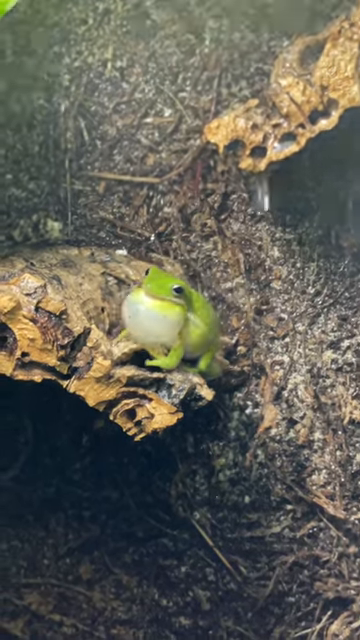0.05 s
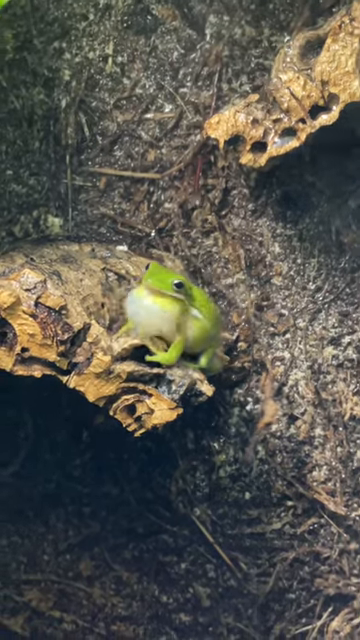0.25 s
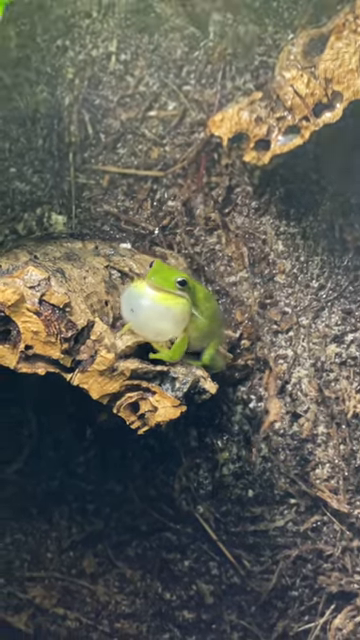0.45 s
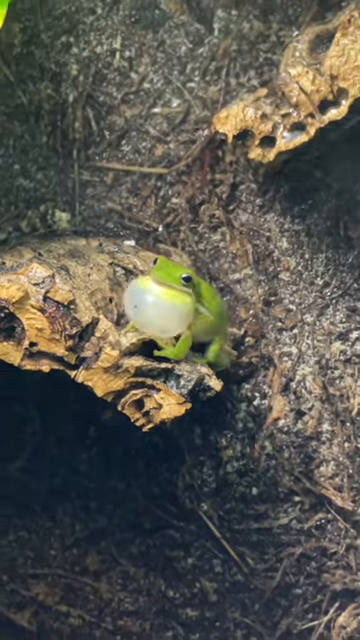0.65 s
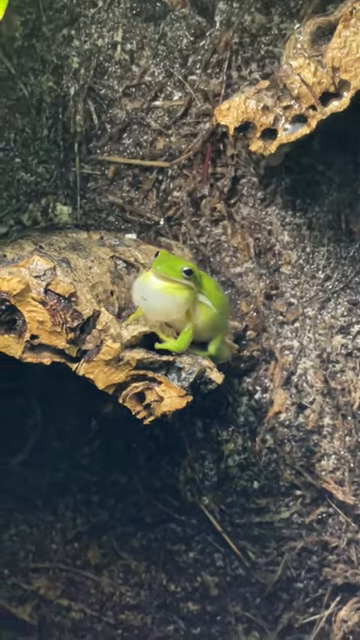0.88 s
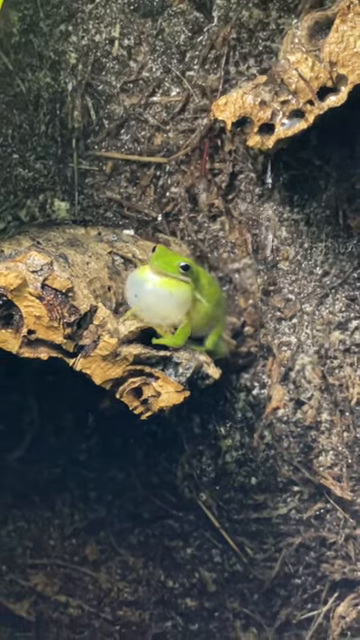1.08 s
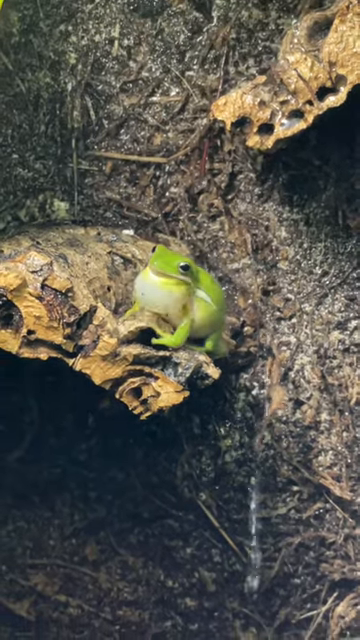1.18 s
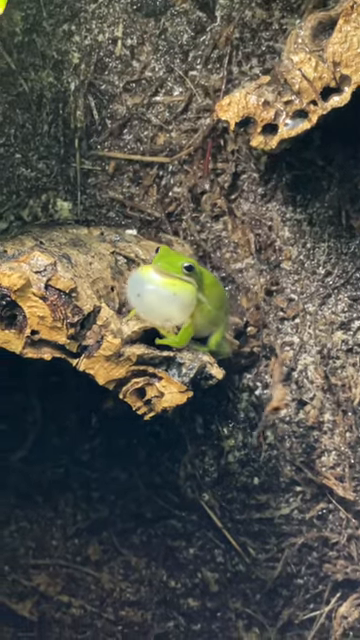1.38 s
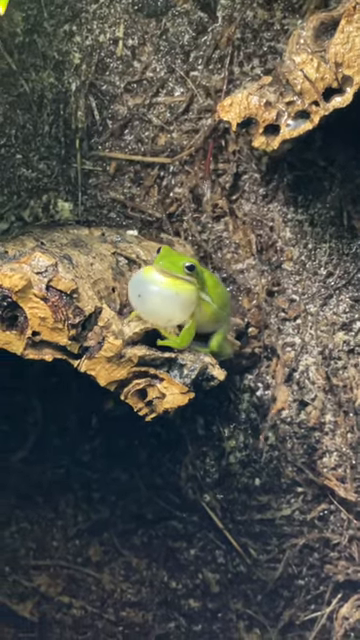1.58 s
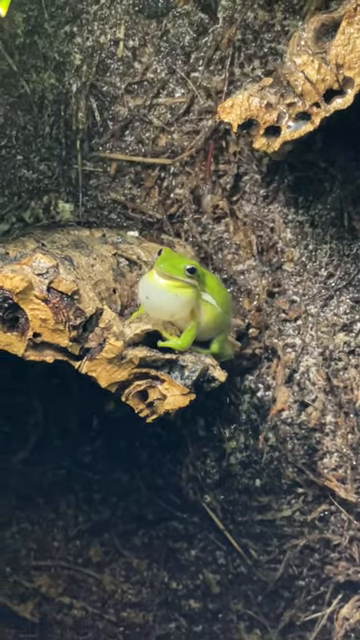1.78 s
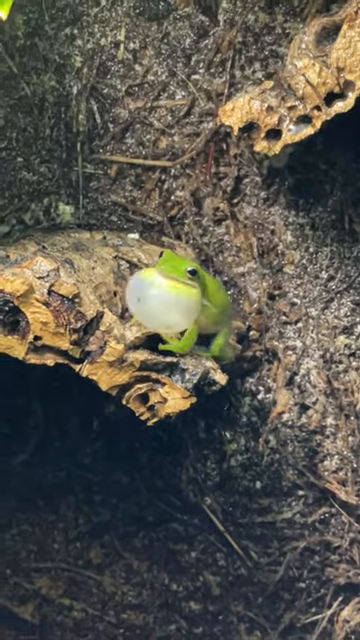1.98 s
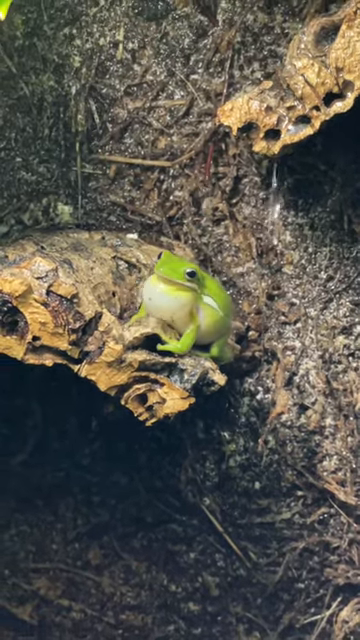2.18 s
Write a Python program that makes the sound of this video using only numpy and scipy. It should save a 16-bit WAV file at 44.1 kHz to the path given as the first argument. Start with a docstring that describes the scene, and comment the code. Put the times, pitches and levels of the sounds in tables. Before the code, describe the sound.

Close to the microphone, a single frog gives six loud, raspy, throbbing croaks at an even pace in a terrarium. A misting nozzle puffs softly twice early on, over the faint hum and rumble of a quiet room.

```python
"""A terrarium in a quiet room, where a green treefrog croaks six times.
Each croak opens with a tick, throbs and rasps as the vocal cords snap irregularly into the
vocal sac, and ends in a short clean note. The tank and the room add faint tails.
A misting nozzle puffs twice at the start; mains hum and a low rumble lie underneath."""
import sys
import numpy as np
from scipy import signal
from scipy.fft import rfft, irfft
from scipy.io import wavfile
from scipy.ndimage import uniform_filter1d

SR = 44100
rng = np.random.default_rng(int(sys.argv[2]) if len(sys.argv) > 2 else 0)


def persist_wave(psi):
    """Save psi, clipped to +-1, as 16-bit WAV."""
    counts = np.round(np.clip(psi, -1, 1) * 32767).astype(np.int16)
    wavfile.write(sys.argv[1], SR, np.atleast_2d(counts).T)


N = 99225
T = np.arange(N) / SR

# Croak cues: (start [s], length [s], rasp level [dB], tone level [dB], cord pitch [Hz],
# first throb rate [Hz], throb depth [0-1], snap rate [1/s], swell time [s], rasp throb fade [s])
CROAK_CUES = [(0.21, 0.121, -14.5, -20, 1021, 48.8, 0.1, 150, 0.06, 0.03),
              (0.553, 0.120, -13, -18, 1032, 47, 0.9, 230, 0.052, 0.038),
              (0.86, 0.096, -12.5, -18.5, 1035, 43.5, 0.83, 250, 0.039, 0.056),
              (1.172, 0.11, -12.5, -18, 1017, 43.7, 0.9, 240, 0.059, .035),
              (1.497, 0.114, -13.5, -18, 1024, 45.3, 0.85, 250, 0.055, 0.032),
              (1.857, 0.12, -13, -18, 1015, 43.35, 0.92, 240, 0.047, 0.035)]
def croak(start, length, rasp_db, tone_db, pitch_hz, throb_hz, depth, snap_rate, swell_s, throb_fade_s):
    """A tick, then a rasp and a cord tone that throb together, ever more slowly."""
    first_throb_s, slowing_s = 0.02, 0.17
    onset_s, attack_s, hold_s, release_s = 0.012, 0.0038, 0.065, 0.014
    rasp_dip_db, tone_dip_db = 41, 24
    rasp_sag_db_per_s, tone_sag_db_per_s = 126, 79
    t = T[:11000]
    throbs = throb_hz * slowing_s * np.log(np.maximum(1 + (t - first_throb_s) / slowing_s, 1e-3))
    trough = depth * np.sin(np.pi * throbs) ** 4
    gate = ramp((t - onset_s) / attack_s) * np.exp(-np.maximum(t - length, 0) / release_s)
    swell_db = -6 * (1 - ramp(t / swell_s))
    sag_s = np.maximum(t - hold_s, 0)
    rasp_throb_db = rasp_dip_db * trough * np.exp(-t / throb_fade_s)
    rasp_shape = gate * from_db(swell_db - rasp_sag_db_per_s * sag_s - rasp_throb_db)
    tone_shape = gate * from_db(swell_db - tone_sag_db_per_s * sag_s - tone_dip_db * trough)
    tone_shape *= ramp((length - t) / release_s + .5)
    rasp = from_db(rasp_db) * (tick_envelope(t) + rasp_shape) * cord_rasp(t, pitch_hz, snap_rate)
    tone = from_db(tone_db) * tone_shape * cord_tone(t, pitch_hz, length)
    return np.interp(T - start, t, rasp + tone, left=0, right=0)


def tick_envelope(t, at_s=0.0014, rise_s=0.0015, decay_s=0.0097):
    """A brief spike that lets the rasp through as the opening tick."""
    return from_db(-22.5) * ramp((t - at_s) / rise_s) * np.exp(-np.abs(t - at_s) / decay_s)


def cord_rasp(t, pitch_hz, snap_rate):
    """Irregular cord snaps, a buzz and a little breath ring the vocal sac."""
    snaps = pulses(snap_rate, jitter=.22, spread_db=2.6)[:len(t)]
    buzz = from_db(-8) * pulses(.94 * pitch_hz, jitter=.035, spread_db=3.5)[:len(t)]
    breath = from_db(-36) * rng.standard_normal(len(t))
    rasp = vocal_sac(snaps + buzz + breath)
    # The main resonance climbs as the sac stretches.
    climb = resonate(rasp, hz=2760, width_hz=410) - resonate(rasp, hz=2480, width_hz=410)
    stretch = ramp((t - 0.033) / 0.038) - 1 / 4
    return hold_level(rasp + stretch * climb)


def cord_tone(t, pitch_hz, length):
    """The pitched core of the croak: it wobbles and arches slightly in the middle."""
    wobble = 0.019 * rms_one(cut(rng.standard_normal(len(t)), 156, "low"))
    arch = 0.012 * (2 * np.sin(np.pi * t / length) - 1)
    return np.sqrt(2) * np.sin(2 * np.pi * np.cumsum(pitch_hz * (1 + wobble + arch)) / SR)


# Peaks and valleys of the throat and vocal sac: (frequency [Hz], relative gain [dB])
SAC_RESPONSE = [(100, -53), (400, -40), (700, -31), (850, -19.5), (950, -16), (1025, -3.5), (1190, -11.5),
                (1280, -10), (1480, -9), (1660, -18.5), (1820, -9), (2020, -9.5), (2150, -10.5),
                (2270, -15.5), (2380, 2), (2510, 1), (2760, -2.5), (2950, -16), (3250, -13), (3400, -17.5),
                (3560, -13.5), (3950, -23.5), (4150, -28.5), (4340, -20), (4450, -35.5), (4620, -17.5),
                (4800, -21), (5100, -40), (5390, -19.5), (5490, -26.5), (5870, -17.5), (6130, -14.5),
                (6300, -24), (6900, -41), (8000, -38.5), (9500, -64), (11000, -72.5), (13000, -48),
                (15500, -48.5), (17000, -75.5)]
def vocal_sac(x, size=4096):
    """The sac rings after every snap of the cords (a minimum-phase filter)."""
    gain = from_db(over_bins(SAC_RESPONSE, size)[0])
    cepstrum = irfft(np.log(gain))[:size // 2]
    ringing = irfft(np.exp(2 * rfft(cepstrum, size) - cepstrum[0]))[:size // 2]
    return signal.fftconvolve(x, ringing)[:len(x)]


# Closing note cues: (start [s], length [s], start pitch [Hz], end pitch [Hz],
# fundamental level [dB], overtone level [dB])
NOTE_CUES = [(0.322, 0.044, 1008, 969, -29, -24.5), (0.672, 0.025, 1107, 1012, -22, -23),
             (0.955, 0.021, 1081, 1051, -20.5, -25.5), (0.979, 0.015, 935, 822, -36, -26.5),
             (1.283, 0.022, 877, 945, -36.5, -19.5), (1.299, 0.019, 1047, 954, -28, -28),
             (1.605, 0.021, 888, 970, -31, -17), (1.621, 0.026, 1107, 960, -22, -22.5),
             (1.97, 0.032, 974, 946, -30.5, -23.5)]
def closing_note(start, length, from_hz, to_hz, tone_db, overtones_db):
    """As the pressure drops, the cords settle into a clean gliding note."""
    attack_s, release_s, fade_db_per_s = .004, .009, 207.5
    t = T[:int((length + release_s) * SR)]
    wobble = .011 * rms_one(cut(rng.standard_normal(len(t)), 430, "low"))
    glide_hz = np.interp(t, [0, length], [from_hz, to_hz])
    phase = 2 * np.pi * np.cumsum(glide_hz * (1 + wobble)) / SR
    wave = from_db(tone_db) * np.sqrt(2) * np.sin(phase) + from_db(overtones_db) * overtones(phase)
    shape = ramp(t / attack_s) * ramp((length - t) / release_s + .5) * from_db(-fade_db_per_s * t)
    return np.interp(T - start, t, wave * shape, left=0, right=0)


# Harmonics 2 to 14 at the cords: (relative level [dB])
CORD_HARMONICS = [-4.5, 1.5, -0.5, 2, 1, -13.5, -7, -12, -5, -5, 9, 3.5, 2.5]
def overtones(phase):
    """Harmonics of smoothly swinging cords, coloured by the sac."""
    harmonics = sum(from_db(db) * np.cos(k * phase) for k, db in enumerate(CORD_HARMONICS, start=2))
    return rms_one(vocal_sac(harmonics))


# The frog's stereo image: (frequency [Hz], left minus right level [dB], left phase lead [rad])
FROG_IMAGE = [(200, -1.5, -1), (500, 0, -.6), (810, 0.5, -1.2), (932, -0.5, 1.5), (1062, 0.7, -0.13),
              (1065, 9.5, -0.17), (1259, -14, -2), (1450, 6.5, 0.4), (1501, -14, 0), (1993, 1.5, 0.3),
              (2600, -0.5, .5), (3770, 0.5, .35), (4900, -1.5, 1.3), (5560, 3, -2), (6050, -1, 0.65),
              (8600, 0.5, 2.5), (13000, 0.5, 1)]
def pan_frog(x):
    """Level and phase offsets spread the frog between left and right."""
    balance_db, lead = over_bins(FROG_IMAGE)
    sides = [from_db(side * balance_db / 2) * np.exp(1j * side * lead / 2) for side in (1, -1)]
    return irfft(rfft(x) * np.array(sides), N)


def reverb(x, t60_s, top_hz=6500, width=.7):
    """Dense reflections blur into a decaying stereo tail."""
    decay = from_db(-60 * T / t60_s) * ramp(T / 0.0025)
    mid, side = cut(rng.standard_normal((2, N)), top_hz, "low") * decay
    tail = mid + width * side * [[1], [-1]]
    return signal.fftconvolve(x[None], rms_one(tail) / np.sqrt(N), axes=1)[:, :N]


# Envelope of the two puffs: (time [s], level [dB])
SPRAY_ENVELOPE = [(0, -38.5), (0.045, -43), (0.09, -55), (0.14, -57.5), (0.2, -86), (0.33, -65),
                  (0.38, -46.5), (0.46, -40), (0.5, -47.5), (0.54, -60), (0.62, -85)]
# Colour of the spray: (frequency [Hz], relative level [dB])
SPRAY_COLOUR = [(120, -34), (200, -14), (916, -7.5), (1000, -4), (1350, -5.5), (2910, -4.5), (7140, -7.5),
                (8740, -19.5), (10300, -33.5), (10900, -37.5), (11500, -28), (12600, -7.5), (16000, -9.5)]
def misting_nozzle():
    """Two soft, hissing puffs of spray."""
    return from_db(np.interp(T, *np.transpose(SPRAY_ENVELOPE))) * noise(SPRAY_COLOUR)


# Mains hum partials: (frequency [Hz], level [dB])
HUM_PARTIALS = [(60, -69), (120, -56.5)]
# Colour of the rumble: (frequency [Hz], relative level [dB])
RUMBLE_COLOUR = [(20, -33.5), (45, -6.5), (70, -1), (100, -6), (160, -13.5), (300, -21.5), (700, -20.5),
                 (2000, -29.5), (6000, -39), (10000, -54.5), (16000, -54.5)]
def room_tone():
    """A steady bed of mains hum and low rumble."""
    hum = sum(from_db(db) * np.sin(2 * np.pi * (hz * T + rng.random())) for hz, db in HUM_PARTIALS)
    rumble = cut(noise(RUMBLE_COLOUR), 35, "high", order=4)
    return np.sqrt(2) * hum + from_db(-64) * rumble


def from_db(db):
    """Decibels to gain."""
    return 10 ** (np.asarray(db) / 20)


def rms_one(x):
    """Scale to rms 1."""
    return x / np.sqrt(np.mean(x ** 2) + 1e-20)


def ramp(x):
    """Smooth rise from 0 to 1."""
    return np.sin(np.pi / 2 * np.clip(x, 0, 1)) ** 2


def cut(x, hz, kind, order=2):
    """Butterworth filter."""
    return signal.sosfilt(signal.butter(order, hz, kind, fs=SR, output="sos"), x + 1e-18)


def resonate(x, hz, width_hz):
    """One resonance with a peak gain of 1."""
    r = np.exp(-np.pi * width_hz / SR)
    feedback = [1, -2 * r * np.cos(2 * np.pi * hz / SR), r * r]
    return signal.lfilter(np.array([1, 0, -1]) * (1 - r * r) / 2, feedback, x + 1e-18)


def over_bins(rows, size=N):
    """Columns of a spectrum table at every FFT bin."""
    hz, *columns = np.transpose(rows)
    bin_hz = np.arange(size // 2 + 1) * SR / size
    return [np.interp(np.log(bin_hz + 1), np.log(hz), column) for column in columns]


def noise(colour):
    """Coloured noise of rms 1."""
    return rms_one(irfft(rfft(rng.standard_normal(N)) * from_db(over_bins(colour)[0]), N))


def pulses(rate, jitter, spread_db, count=300):
    """A train of clicks, uneven in timing and strength."""
    timing, strength = np.clip(rng.standard_normal((count, 2)), -2, 2).T
    at = (np.cumsum(np.exp(jitter * timing)) / rate * SR).astype(int)
    return np.bincount(at[at < N], from_db(spread_db * strength[at < N]), N)


def hold_level(x, size=450):
    """Ride the gain to keep the running rms near 1."""
    power = uniform_filter1d(uniform_filter1d(x * x, size), size)
    return x / np.sqrt(np.abs(power) + 1e-9)


def scene():
    """The frog up front, its reflections in the tank and the room, then mist and room tone."""
    frog = sum(croak(*cue) for cue in CROAK_CUES) + sum(closing_note(*cue) for cue in NOTE_CUES)
    tank = from_db(-27) * reverb(frog, t60_s=0.056)
    room = from_db(-29) * reverb(frog, t60_s=0.49)
    return pan_frog(frog) + tank + room + misting_nozzle() + room_tone()


def record(dry):
    """A soft clip rounds the highest peaks and a steep low-pass trims the top."""
    ceiling, cutoff_hz = .98, 16000
    rounded = dry / (1 + (dry / ceiling) ** 8) ** (1 / 8)
    return signal.sosfilt(signal.ellip(10, .1, 80, cutoff_hz, fs=SR, output="sos"), rounded)


dry = scene()
out = record(dry)
persist_wave(out)
```